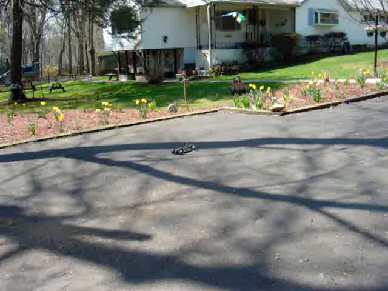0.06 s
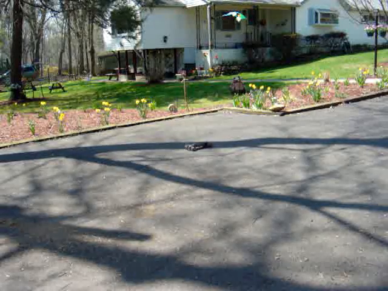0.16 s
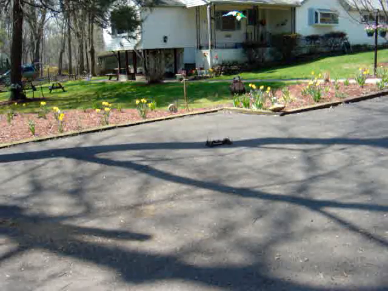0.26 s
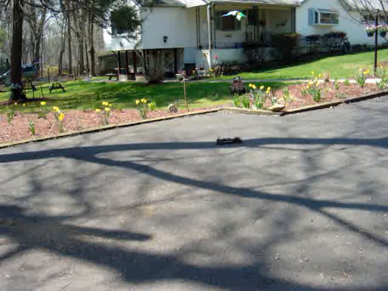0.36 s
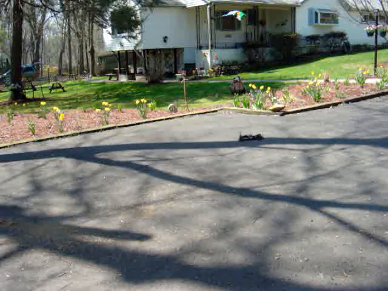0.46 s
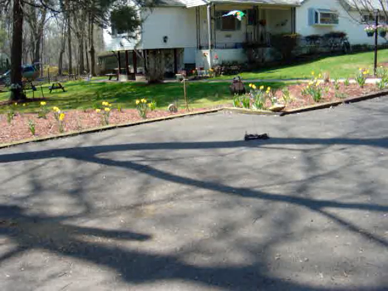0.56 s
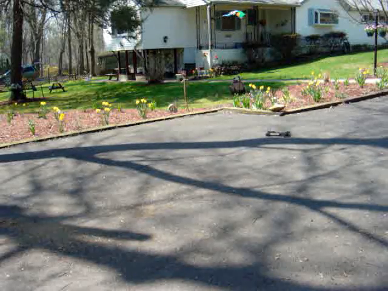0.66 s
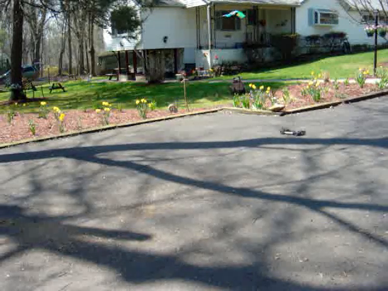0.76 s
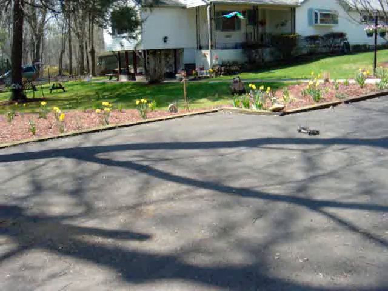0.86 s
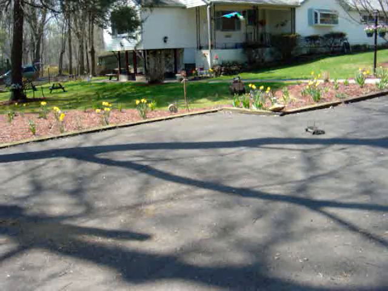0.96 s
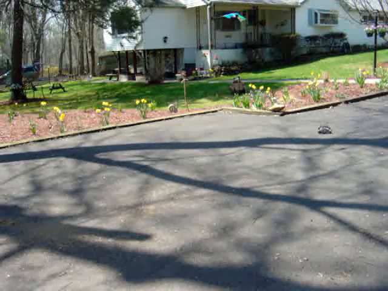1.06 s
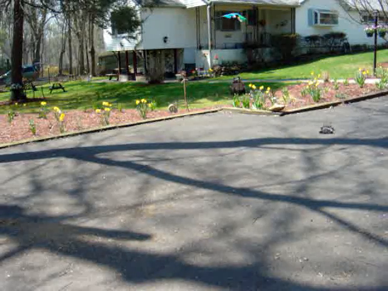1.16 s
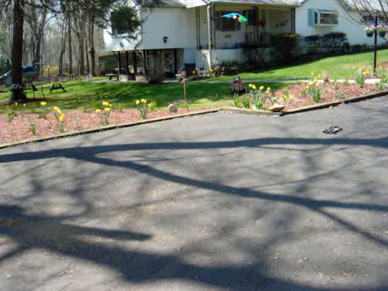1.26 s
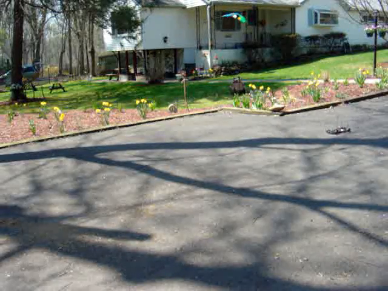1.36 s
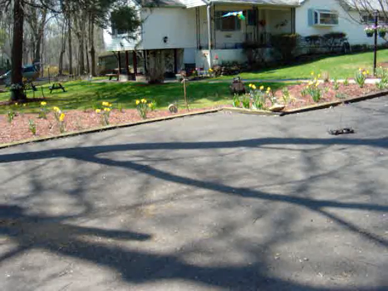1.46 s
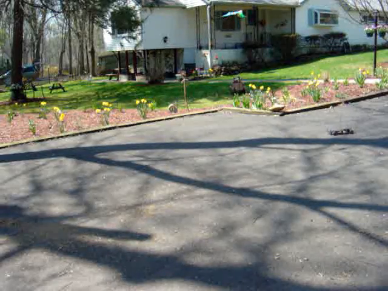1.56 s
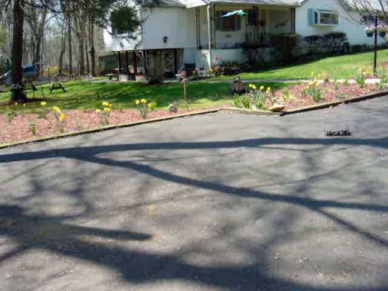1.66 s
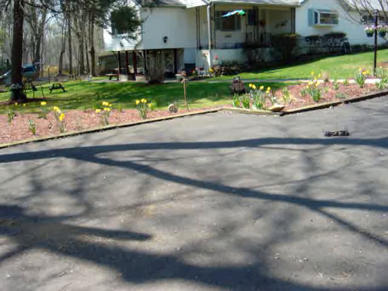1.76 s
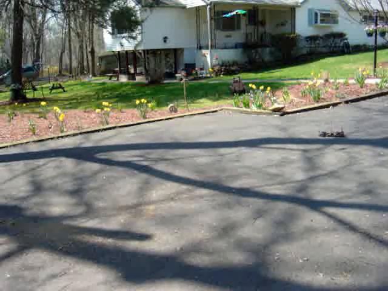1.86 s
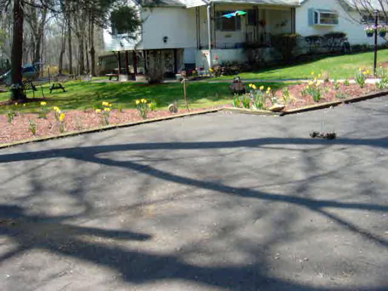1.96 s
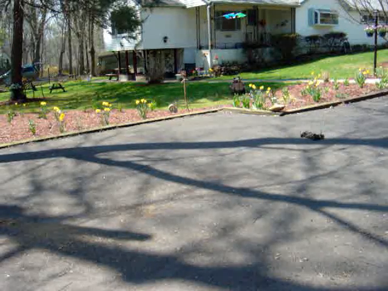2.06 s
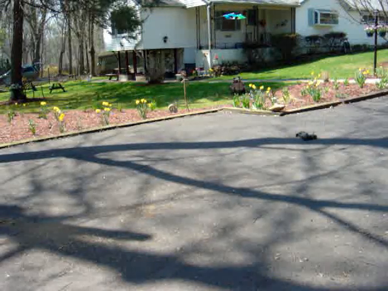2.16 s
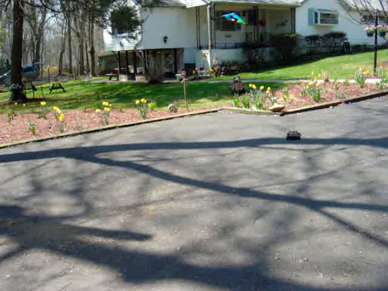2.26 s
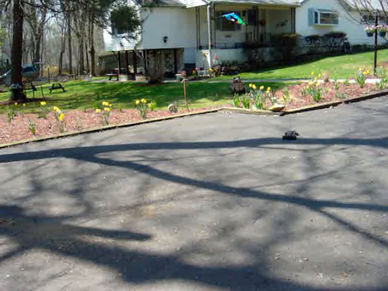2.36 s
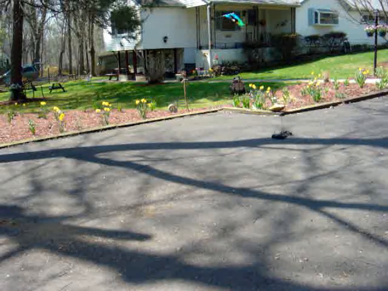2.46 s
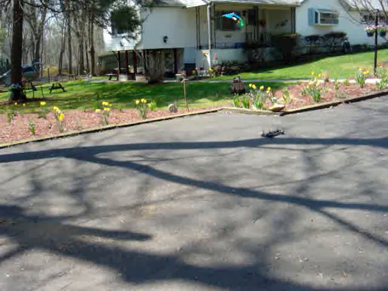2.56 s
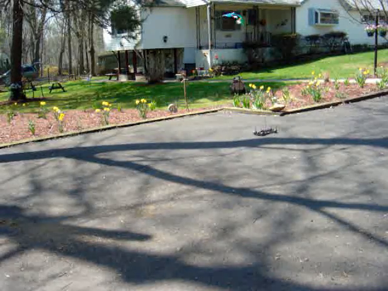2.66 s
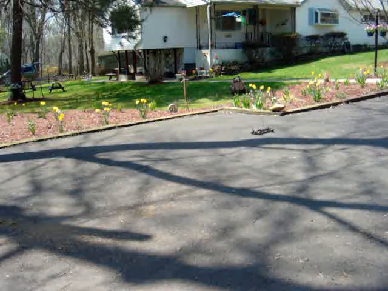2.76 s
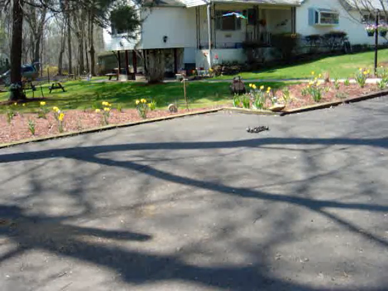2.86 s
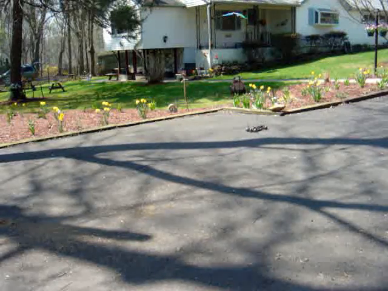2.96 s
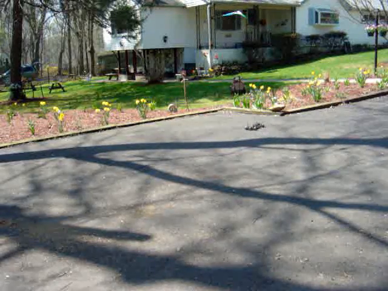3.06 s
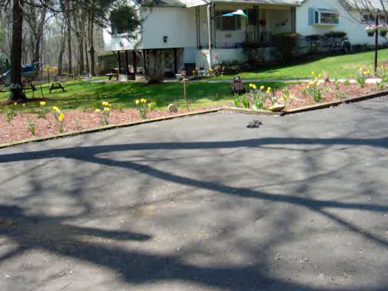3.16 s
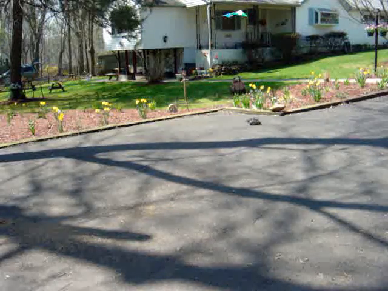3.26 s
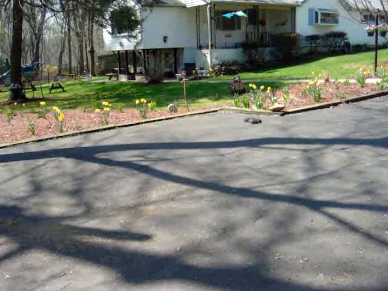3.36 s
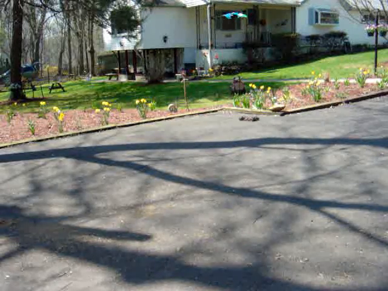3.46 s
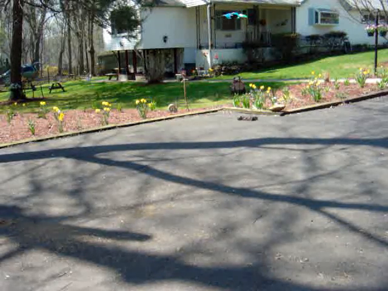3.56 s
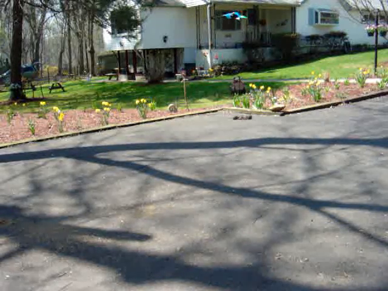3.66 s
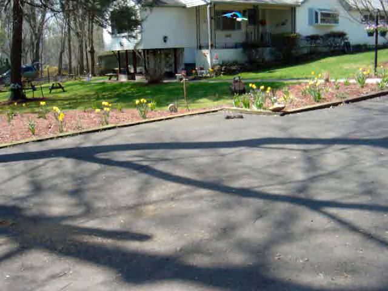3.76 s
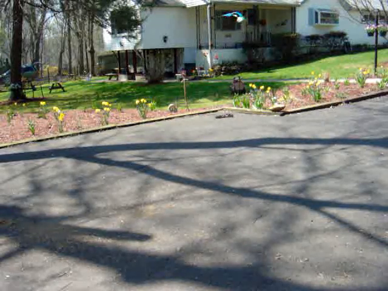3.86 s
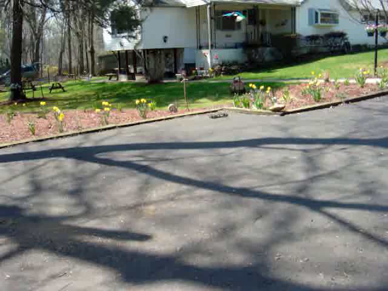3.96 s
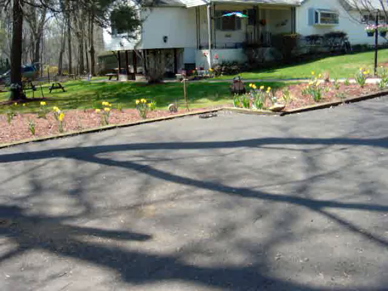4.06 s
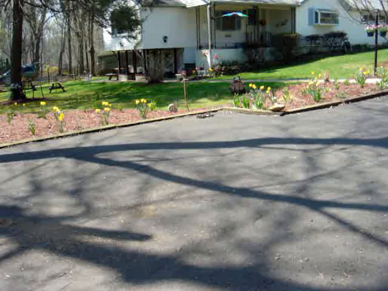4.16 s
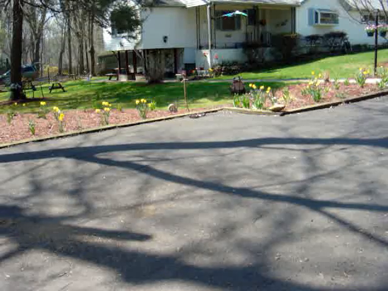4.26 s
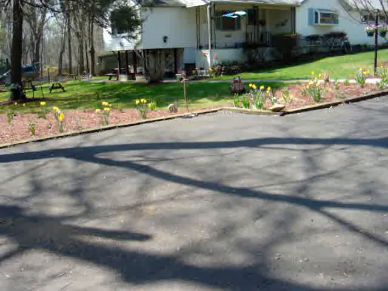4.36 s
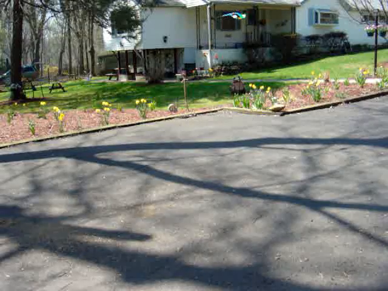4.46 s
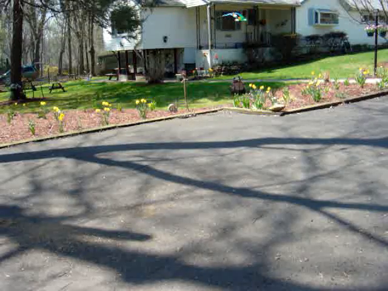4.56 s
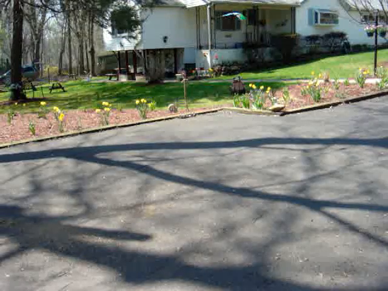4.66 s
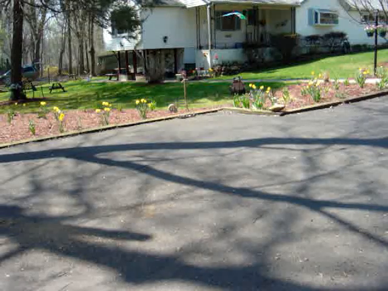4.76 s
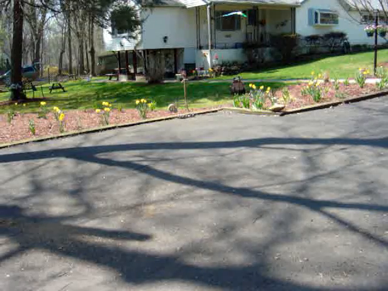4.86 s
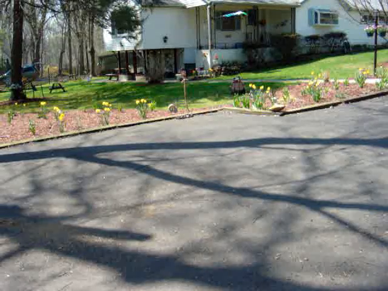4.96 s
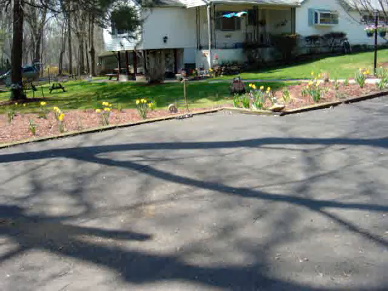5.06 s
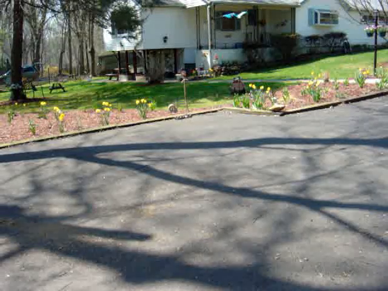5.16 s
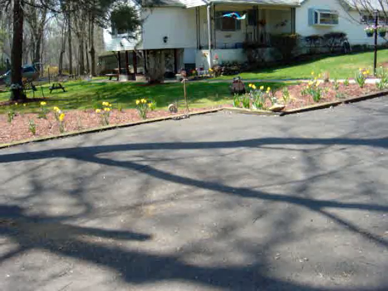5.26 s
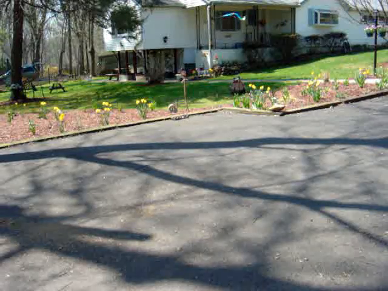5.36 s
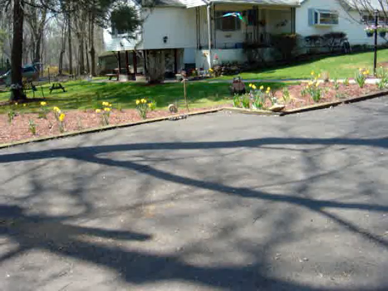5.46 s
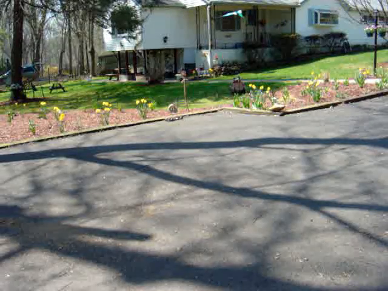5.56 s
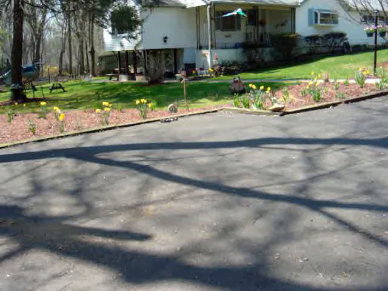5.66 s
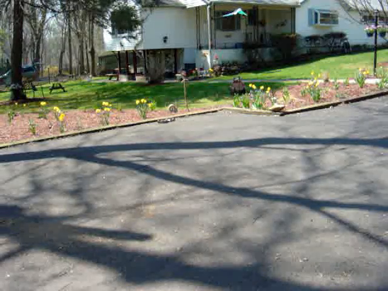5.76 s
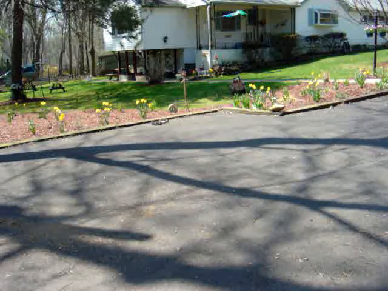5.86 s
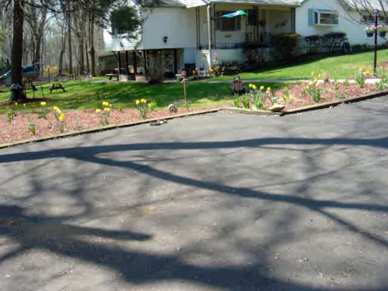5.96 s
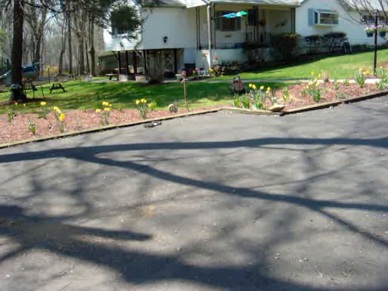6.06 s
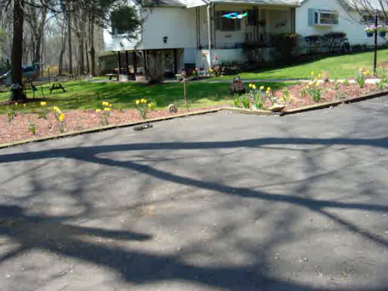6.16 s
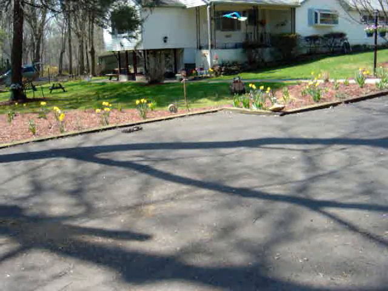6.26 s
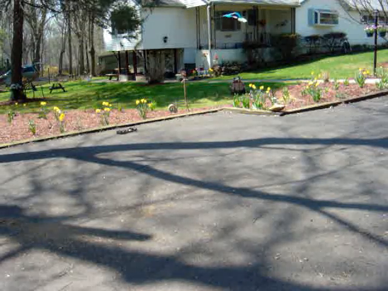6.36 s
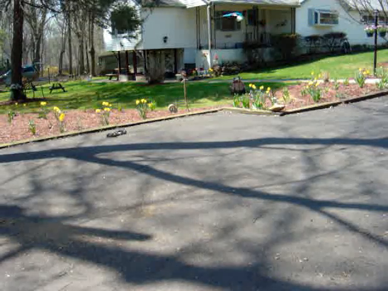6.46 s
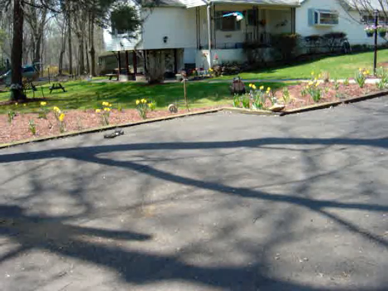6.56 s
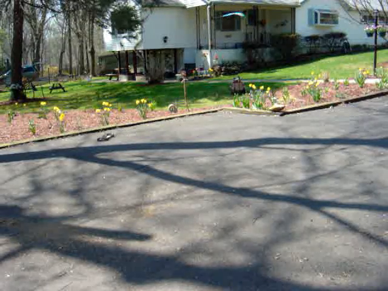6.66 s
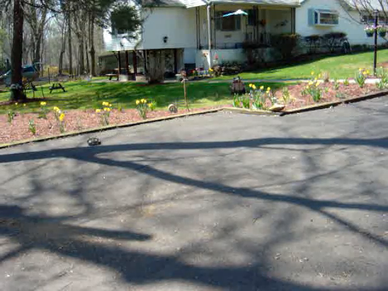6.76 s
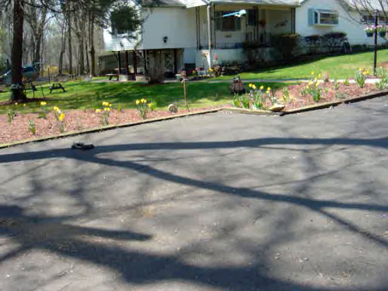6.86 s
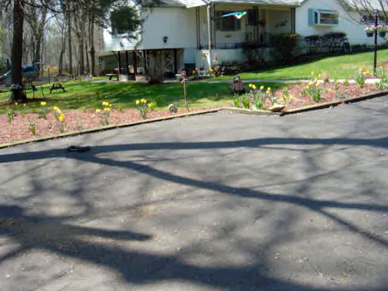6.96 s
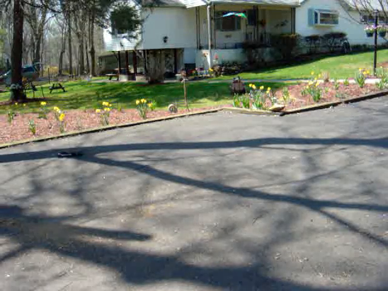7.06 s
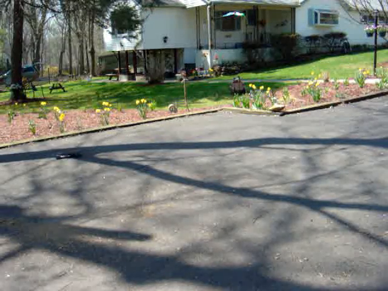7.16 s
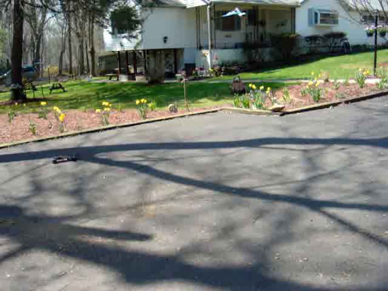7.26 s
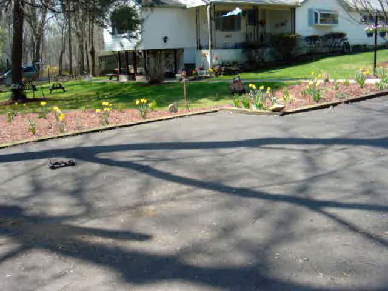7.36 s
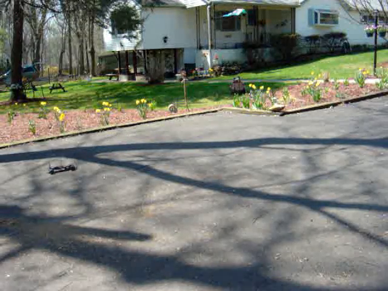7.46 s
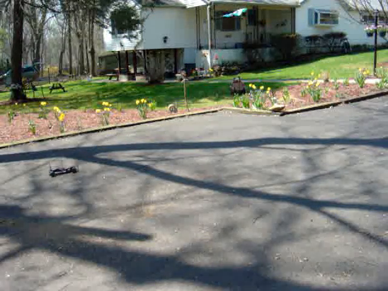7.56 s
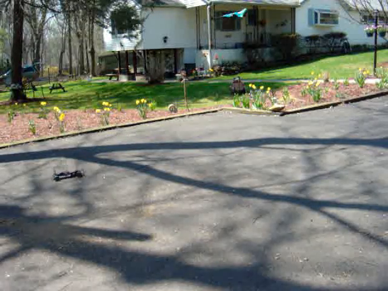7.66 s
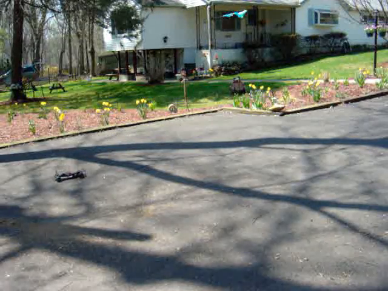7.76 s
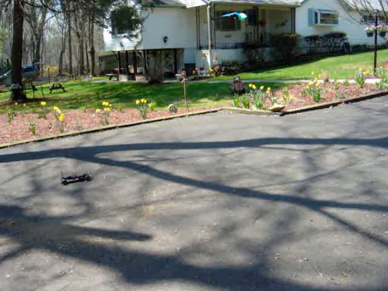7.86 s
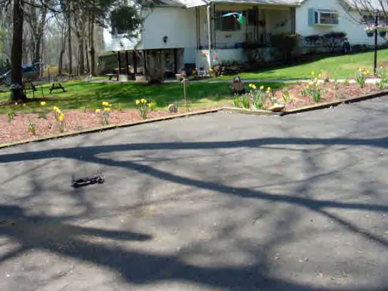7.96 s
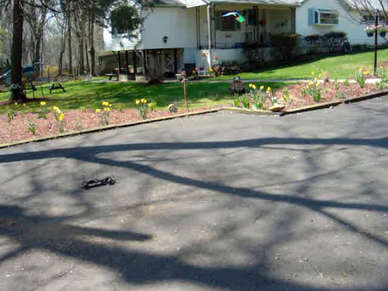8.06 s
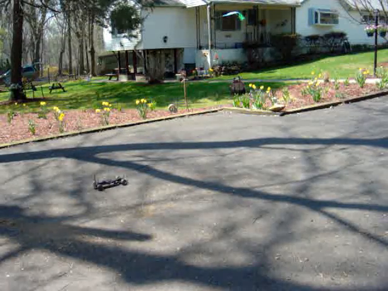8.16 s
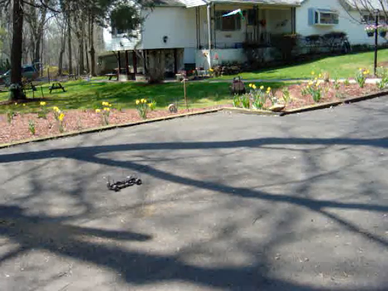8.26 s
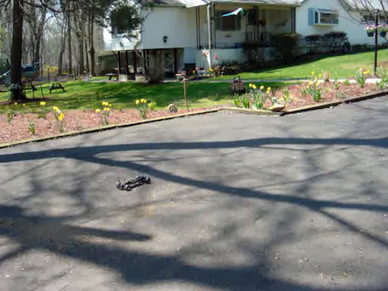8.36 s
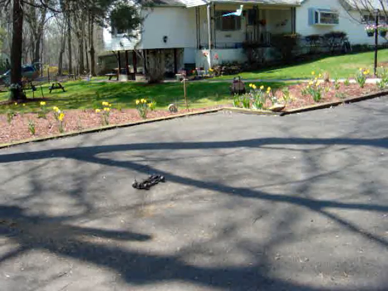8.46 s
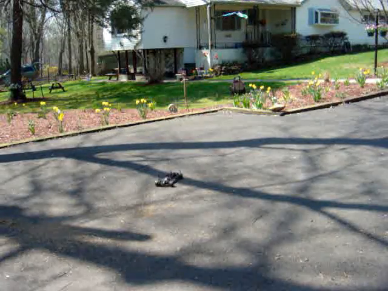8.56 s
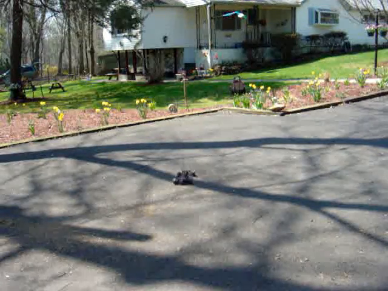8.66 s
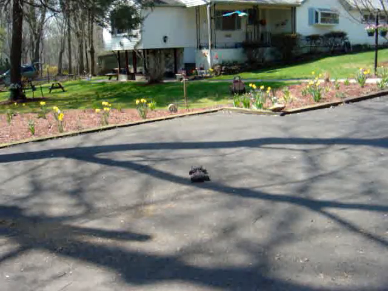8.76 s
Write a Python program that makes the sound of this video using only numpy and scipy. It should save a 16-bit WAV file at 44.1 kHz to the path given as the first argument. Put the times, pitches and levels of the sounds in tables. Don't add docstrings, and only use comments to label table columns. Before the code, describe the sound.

A small electric model car runs on an outdoor asphalt driveway, heard by a coarse pocket camera microphone. At 0 s its gear whine is already very high, then plunges, climbs again by 0.7 and drops almost away near 1.1. From 1.2 to 3 it surges repeatedly, with gritty tyre hiss, shell rattle and sharp stone clicks, notably around 1.8 and 2.7. After a peak near 3.05 it dips, then makes quick rising and falling blips until 4.4. From 4.4 to 6.5 it is weaker: near pauses, brief revs around 4.9 and 5.4, then a low, jerky whine. At 6.7 it shoots up, drops at 7, and climbs into fast, bright tyre hiss from 7.4, with the whine piercing again near 8.7. Wind gusts thump low throughout, strongest around 0.5-1.9, 5.6-6.1, 7.2 and 8.5, over faint tree and road rustle and barely audible squeals.

```python
import sys
import numpy as np
from scipy import signal
from scipy.fft import rfft, irfft
from scipy.io import wavfile
from scipy.ndimage import uniform_filter1d

SR = 44100
rng = np.random.default_rng(int(sys.argv[2]) if len(sys.argv) > 2 else 0)


def unload_wav(signal):
    wavfile.write(
        sys.argv[1],
        SR,
        np.round(np.clip(np.atleast_2d(signal).T, -1, 1) * 32767).astype(np.int16),
    )


def how_loud(loudness_db):
    steps = np.asarray(loudness_db, float) / 20
    return 10 ** steps


N = 387638

# time reached in
# seconds, tooth rate in Hz, tooth force in dB.
THROTTLE = [(0.0, 7580, -19), (.12, 8120, -29.5), (.3, 3200, -19), (.37, 2430, -27),
            (.45, 2700, -24.5), (.54, 3700, -18), (.58, 5100, -34), (.67, 7230, -24.5),
            (.83, 2250, -26), (.92, 2100, -58), (1.13, 780, -48), (1.26, 3350, -24.5),
            (1.36, 5330, -33), (1.45, 3620, -21), (1.55, 1680, -25), (1.68, 2870, -22.5),
            (1.78, 4500, -24), (1.95, 6110, -27), (2.2, 5260, -21), (2.5, 4200, -27.5),
            (2.7, 3510, -19), (2.82, 4050, -18), (2.87, 5000, -38), (3.045, 7500, -29),
            (3.16, 3550, -29), (3.22, 1651, -33), (3.27, 1600, -48),
            (3.33, 1764, -22.5), (3.4, 3330, -27.5), (3.474, 5150, -27), (3.649, 1430, -37),
                 (3.76, 3600, -24.5), (3.8, 4700, -39), (3.855, 6490, -23), (3.9, 6770, -20.5),
                 (4.07, 1490, -32.5), (4.23, 3850, -22), (4.36, 1700, -40), (4.741, 600, -51),
                 (4.84, 2300, -29), (4.946, 4000, -25), (5.07, 300, -38), (5.219, 300, -46),
                 (5.33, 2200, -26), (5.4, 4050, -24), (5.47, 4960, -31.5), (5.56, 2500, -26.5),
                 (5.629, 800, -46), (5.72, 910, -50), (5.79, 1060, -42), (5.85, 1410, -34),
                 (5.93, 1450, -41), (5.975, 2040, -23), (6.02, 1625, -35), (6.065, 1736, -25.5),
                 (6.3, 1570, -28.5), (6.55, 1600, -32),
            (6.61, 1740, -29), (6.71, 3500, -23), (6.86, 7990, -29), (6.999, 3353, -28.5),
                   (7.055, 2540, -23), (7.13, 3295, -18.5), (7.27, 4550, -24), (7.4, 5505, -53),
                   (7.6, 7000, -47), (8.149, 6160, -33), (8.35, 6850, -25.5), (8.551, 5090, -36),
                   (8.721, 6980, -14.5), (8.79, 6800, -40)]
# centre in Hz, width in Hz, boost in dB.
GEAR_CASE = [(3460, 410, 4.5), (6760, 230, 9), (5630, 1100, -4), (990, 690, -2)]
# pitch in Hz, level in dB per Hz.
CHASSIS = [(410, -20.5), (830, -14), (1200, -15), (1600, -12), (2100, -8), (2600, -4.5), (3900, -7.5),
           (5600, -6), (6800, -7.5), (9000, -3.5), (9900, -5.5)]
# centre in Hz, width in Hz, boost in dB.
SHELL_RINGS = [(3050, 700, 7), (4900, 330, 6), (6350, 300, 3), (7400, 600, 4.5)]
TYRE_BORDERS_HZ = [0, 1100, 2200, 4200, 6200, 10000]
# level in dB at REF_HZ, dB per octave of wheel speed,
# share of the grip, share of the facing.
TYRE_PARTS = [
    (-34, 2, 0.42, 1.6),
    (-24.5, 3, 0.85, -0.08),
    (-27.5, 3.5, 0.99, 0.05),
    (-20, 5, 1.11, -.3),
]
# time in seconds, level in dB.
GRIP = [(0.0, -1.5), (.4, 1), (.68, -1), (1.0, 4), (1.5, 1), (2.0, -2), (2.45, 2.5), (3.1, -0.5), (3.9, -3),
        (4.4, 0), (4.5, -6), (4.9, -6.5), (5.15, -8.5), (5.5, -3.5), (5.72, -10), (6.5, -3), (7.05, 1),
        (8.79, 0.5)]
# middle in seconds, length in seconds, boost in dB.
SKIDS = [(1.814, 0.13, 3), (2.42, 0.14, -0.5), (3.51, .12, 3), (4.227, 0.087, 1), (4.92, 0.14, 8.5),
         (5.544, 0.042, 1), (7.54, 0.55, -1), (8.1, 0.092, 1), (3.18, .1, 1.5), (4.3, 0.066, 1),
         (5.76, 0.02, 9), (6.608, 0.034, -1), (1.6, .15, -0.5), (0.854, 0.097, 3), (2.15, 0.1, -1),
         (4.65, 0.046, 2.5), (3.63, 0.1, 5), (3.32, 0.07, -4.5)]
# time in seconds, level in dB.
FACING = [(0.0, 1.5), (.9, 3.5), (1.4, -1), (2.1, -1), (3.0, 0.5), (5.6, -2), (6.0, 1), (7.0, 0.5),
          (8.79, 0.5)]
# start in seconds, peak in dB, pitch in Hz.
STONES = [(0.595, -3, 3130), (0.83, -3, 2780), (0.874, -3, 3030), (1.012, -26, 3100), (1.141, -8, 3100),
          (1.3054, -21, 3230), (1.7518, 0.5, 3040), (1.816, 1, 2600), (2.099, -8, 3150), (2.436, -6, 2890),
          (2.6636, 1, 3330), (3.6364, -7, 2800), (3.817, -10, 3070), (3.9002, -6, 6690), (4.1728, -6, 3140),
          (4.2097, -2, 2954), (4.408, -4.5, 3200), (5.2198, -15.5, 3120), (5.4746, -5, 3150),
          (6.6183, -5.5, 1870), (7.1893, -3, 4190), (7.3477, -17, 2660), (7.4024, -11, 3180),
          (7.885, -22, 2960)]
# start in seconds, hold in seconds, level in dB.
GUSTS = [(0.154, 0.016, -32), (0.535, 0.05, -21.5), (0.827, 0.074, -23.5), (1.065, 0.035, -45),
         (1.21, 0.025, -33), (1.336, 0.074, -23.5), (1.55, .09, -22), (1.79, 0.15, -21.5), (2.96, .02, -33),
         (3.571, 0.13, -31), (3.82, .08, -32.5), (4.398, .12, -38), (4.91, 0.073, -38), (5.159, 0.075, -27),
         (5.383, .09, -28.5), (5.587, 0.099, -25), (5.795, 0.28, -22.5), (6.623, .02, -25.5),
         (6.72, 0.014, -28.5), (7.065, 0.019, -27), (7.19, 0.0076, -21), (7.249, .2, -29),
         (7.588, .05, -26), (7.7, 0.62, -37.5), (8.489, 0.097, -23), (8.698, .05, -29.5)]
# pitch in Hz, level in dB per Hz.
WIND_COLOUR = [(12, -47), (20, 2), (37, -26), (70, 4.5), (151, 5), (270, -3.5), (325, -8), (375, -10.5),
               (600, -26), (780, -48), (1320, -120)]
# pitch in Hz, level in dB per Hz.
YARD_COLOUR = [(120, -33), (200, -31), (247, -3), (306, -2.5), (484, 1.5), (629, -3), (858, -2),
               (1190, -10), (2490, -40), (10000, -29), (13000, -70), (22000, -120)]
# start in seconds, end in seconds, pitch in Hz, level in dB. A negative start
SQUEALS = [
    (-2, 3.3, 1009, -48.5),
    (1.55, 2.24, 1009, -41.5),
    (0, 0.2, 820, -41),
    (5.5, 5.85, 980, -45),
    (8.05, 8.4, 630, -44),
    (5.05, 5.2, 2400, -52),
    (7.7, 7.8, 1470, -38.5),
]

MOTOR_STEPS = 1000
TORQUE_DB, TORQUE_OCT_PER_S = 3, 8
CRAWL_HZ, LURCH, LURCH_HZ = 2100, .04, 110
STUTTER_DB, STUTTER_HZ = 4.5, 45
REF_HZ, LAG_S = 4500, 0.018
CALM_DB, RISE_DB_PER_S, FALL_DB_PER_S = -43.5, 356, 226
YARD_DB = -41.5
CAMERA_RATE, EDGE_HZ, UPLOAD_EDGE_HZ = 32000, 10090, 15830


def whine(rows, beat_db=3, teeth=21.0, runout=0.45):
    s, *columns = np.transpose(rows)
    t = np.arange(s[0], s[-1], 1 / SR)
    hz, db = (np.interp(t, s, c) for c in columns)
    wobble = np.interp(hz, [3400, 5500], [.02, .034])
    surge = np.interp(hz, [1900, 2600], [.028, .006])
    unsteady_hz = hz * (1 + wobble * wander(len(t), 200) + surge * wander(len(t), 25))
    turns = np.cumsum(unsteady_hz) / SR
    slack_db = 1.5 * wander(len(t), 30)
    throb = how_loud(beat_db * wander(len(t), 70) + slack_db)
    throb = throb * (1 + runout * np.cos(2 * np.pi * turns / teeth))
    chatter_db = np.interp(hz, [1800, 2600], [-7, -20])
    octave_db = chatter_db + body_db(2 * hz) + beat_db * wander(len(t), 43)
    octave = how_loud(octave_db) * np.sin(4 * np.pi * turns)
    tone = how_loud(body_db(hz)) * np.sin(2 * np.pi * turns) * evened(throb)
    return s[0], np.sqrt(2) * how_loud(db) * (tone + octave) * signal.windows.tukey(len(t), .002)


def motor():
    s, hz, db = np.transpose(THROTTLE)
    t = np.arange(0, N / SR, 1 / MOTOR_STEPS)
    hz, db = glide(t, s, hz), np.interp(t, s, db)
    torque = np.tanh(abs(np.gradient(np.log2(hz), t)) / TORQUE_OCT_PER_S)
    stutter = wander(len(t), STUTTER_HZ * SR / MOTOR_STEPS)
    jerks = wander(len(t), LURCH_HZ * SR / MOTOR_STEPS)
    hz = hz * (1 + LURCH * (hz < CRAWL_HZ) * jerks)
    ring_db = resonances_db(GEAR_CASE, hz)
    return t, hz, db + ring_db + TORQUE_DB * torque + STUTTER_DB * np.minimum(stutter, .5)


def glide(t, s, value):
    step = np.diff(value) / np.diff(s)
    pair = step[1:] * step[:-1]
    slope = 2 * pair.clip(0) / (step[1:] + step[:-1] + (pair <= 0) * 1e9)
    slope = np.r_[0, slope, 0]
    k = np.clip(np.searchsorted(s, t, "right") - 1, 0, len(s) - 2)
    span = np.diff(s)[k]
    u = ((t - s[k]) / span).clip(0, 1)
    ease = u * u * (3 - 2 * u)
    bend = span * u * (1 - u) * ((1 - u) * slope[k] - u * slope[k + 1])
    return value[k] + ease * np.diff(value)[k] + bend


def tyres(grains_per_s=260, spread_db=6.5, grit=0.27, patchy_db=0.5):
    snaps = how_loud(spread_db * np.minimum(rng.exponential(1, N), 4)) * (rng.random(N) < grains_per_s / SR)
    bursts = signal.lfilter([1], [1, -np.exp(-1 / (.0022 * SR))], snaps)
    drive = (1 + grit * evened(bursts)) * rng.standard_normal(N)
    drive = drive * how_loud(1.2 * wander(N, 60))
    hz, t, z = signal.stft(drive, SR, nperseg=256, noverlap=192)
    z = z * how_loud(body_db(hz))[:, None]
    patches = drifting_patches(z, 14, 5)
    s, *levels_db = scrub()
    part = np.clip(np.searchsorted(TYRE_BORDERS_HZ, hz) - 2, 0, 3)
    gains_db = []
    for k, level_db in enumerate(levels_db):
        power = abs(z[(part == k) & (hz > 1100)]) ** 2
        mean_db = 10 * np.log10(2 * power.mean(1).sum() / 1.5)
        gains_db.append(np.interp(t, s, level_db) - mean_db)
    gain_db = uniform_filter1d(np.array(gains_db)[part], 5, 0)
    z = z * how_loud(gain_db + patchy_db * patches)
    return signal.istft(z, SR, nperseg=256, noverlap=192)[1][:N]


def scrub():
    t, hz, _ = motor()
    speed = uniform_filter1d(np.log2(hz / REF_HZ), max(round(LAG_S * MOTOR_STEPS), 1))
    octaves = np.interp(t - LAG_S / 2, t, speed)
    grip_db = np.interp(t, *np.transpose(GRIP))
    facing_db = np.interp(t, *np.transpose(FACING))
    for s, length, db in SKIDS:
        grip_db = grip_db + db * np.exp(-(2 * (t - s) / length) ** 2)
    return [t] + [db + slope_db * octaves + grip * grip_db + face * facing_db
                  for db, slope_db, grip, face in TYRE_PARTS]


def body_db(hz):
    return read(CHASSIS, hz) + resonances_db(SHELL_RINGS, hz)


def resonances_db(rows, hz):
    return sum(db / (1 + (2 * (hz - f) / width) ** 2) for f, width, db in rows)


def stones(t60=0.017, rise_s=0.0015):
    out, t = np.zeros(N), np.arange(900) / SR
    for s, db, hz in STONES:
        scratch = 0.85 * np.diff(rng.standard_normal(900), prepend=0)
        ring = np.sin(2 * np.pi * hz * t)
        fade = how_loud(db - 60 * t / t60) * (1 - np.exp(-t / rise_s))
        add(out, s, fade * (ring + scratch))
    return out


def wind(lumpy_db=2.6):
    t = np.arange(0, N / SR, 1 / 1000)
    power = how_loud(CALM_DB) ** 2
    for s, hold, db in GUSTS:
        drop_db = np.maximum(RISE_DB_PER_S * (s - t), FALL_DB_PER_S * (t - s - hold)).clip(0)
        power = power + how_loud(db - drop_db) ** 2
    eddies = mottled(coloured(rng.standard_normal(N), WIND_COLOUR), patchy_db=3.2)
    puffs = evened(eddies * how_loud(lumpy_db * wander(N, 37.5)))
    return puffs * np.interp(np.arange(N) / SR, t, np.sqrt(power))


def yard():
    rustle = coloured(rng.standard_normal(N), YARD_COLOUR)
    out = how_loud(YARD_DB) * mottled(rustle, patchy_db=-1.0, frames=10)
    for start, end, hz, db in SQUEALS:
        count = round((end - start) * SR)
        tone = np.sin(2 * np.pi * np.cumsum(hz * (1 + 0.00673 * wander(count, 13.5))) / SR)
        add(out, start, how_loud(db + 4.8 * wander(count, 19)) * tone * signal.windows.tukey(count, .3))
    return out


def mottled(x, patchy_db, frames=6, bins=3):
    z = signal.stft(x, nperseg=1024, noverlap=768)[2]
    z = z * how_loud(patchy_db * drifting_patches(z, frames, bins))
    return evened(signal.istft(z, nperseg=1024, noverlap=768)[1][:len(x)])


def drifting_patches(z, frames, bins):
    patches = uniform_filter1d(rng.standard_normal(z.T.shape), frames, 0)
    return evened(uniform_filter1d(patches, bins, 1)).T


def coloured(x, points):
    return evened(irfft(rfft(x) * how_loud(read(points, np.fft.rfftfreq(len(x), 1 / SR))), len(x)))


def read(points, hz):
    f, value = np.transpose(points)
    return np.interp(np.log(hz + 1), np.log(f + 1), value)


def wander(count, hz):
    width = max(round(SR / hz / 2), 1)
    return evened(uniform_filter1d(uniform_filter1d(rng.standard_normal(count), width), width))


def evened(x):
    return x / np.sqrt(np.mean(x ** 2) + 1e-20)


def add(mix, s, sound):
    part = mix[round(s * SR):][:len(sound)]
    part += sound[:len(part)]


def scene():
    gears = np.zeros(N)
    add(gears, *whine(np.transpose(motor())))
    add(gears, .045, how_loud(-15) * gears.copy())
    return (gears + tyres() + stones() + wind() + yard())[None]


def camera_rounding(x, coarse_hz=4700, step=0.73):
    hz, t, z = signal.stft(x, CAMERA_RATE, "cosine", nperseg=64, noverlap=32)
    blocks = np.arange(0, len(t), 12)
    top = np.maximum.reduceat(abs(z), blocks, 1)
    shortage = evened(uniform_filter1d(rng.standard_normal(top.T.shape), 3, 1)).T
    margin_db = 20 * np.log10(top / top[2:].max(0) + 1e-9) + 30
    kept = shortage < .3 + margin_db / 25
    size, kept = (np.repeat(v, 12, 1)[:, :len(t)] for v in (step * top + 1e-12, kept))
    z = np.where(hz[:, None] > coarse_hz, np.round(z / size) * size * kept, z)
    return signal.istft(z, CAMERA_RATE, "cosine", nperseg=64, noverlap=32)[1]


def top_cut(x):
    return signal.sosfilt(signal.butter(12, 17100, fs=SR, output="sos"), x)


def record(dry):
    soft = np.tanh(dry[0] / 1.1) * 1.1
    slow = camera_rounding(signal.resample_poly(soft, 320, 441))
    slow = signal.oaconvolve(slow, signal.firwin(1201, EDGE_HZ, fs=CAMERA_RATE), "same")
    held = slow[np.arange(N) * CAMERA_RATE // SR]
    upload_filter = signal.firwin(1001, UPLOAD_EDGE_HZ, window=("kaiser", 9), fs=SR)
    held = signal.oaconvolve(held, upload_filter, "same")
    return top_cut(held[None])


dry = scene()
out = record(dry)
unload_wav(out)
```